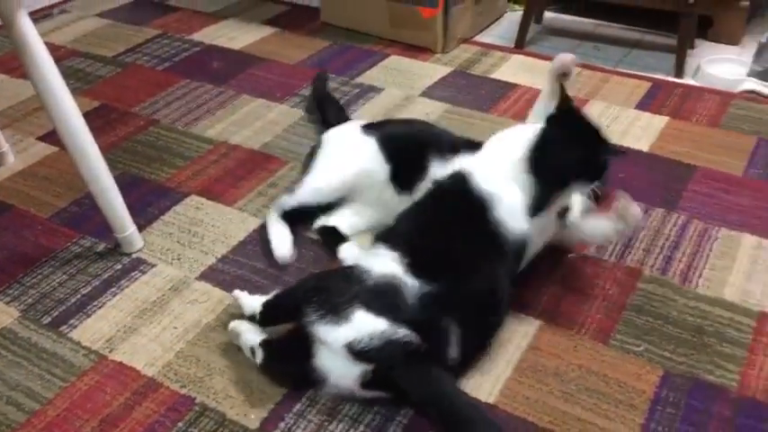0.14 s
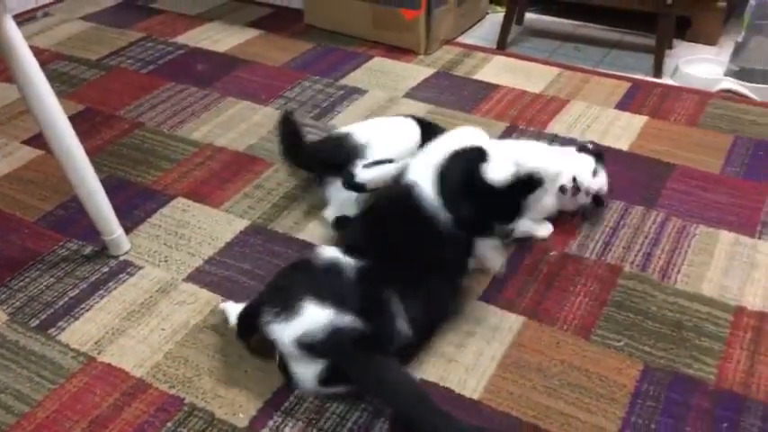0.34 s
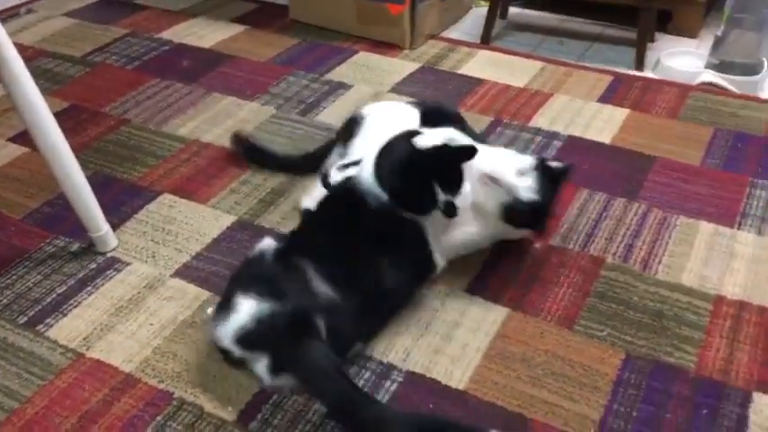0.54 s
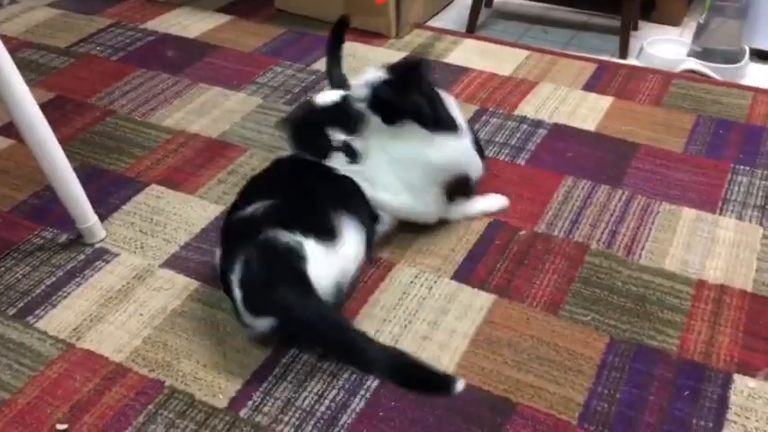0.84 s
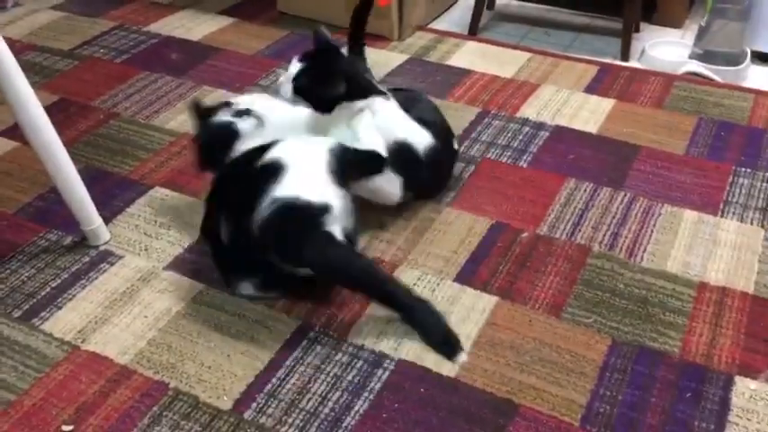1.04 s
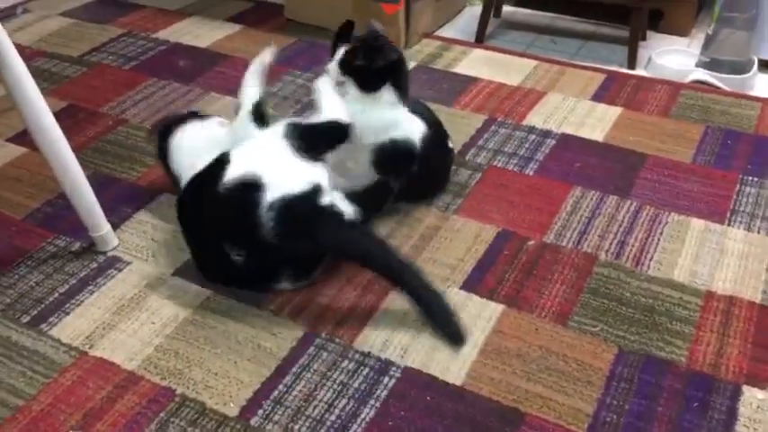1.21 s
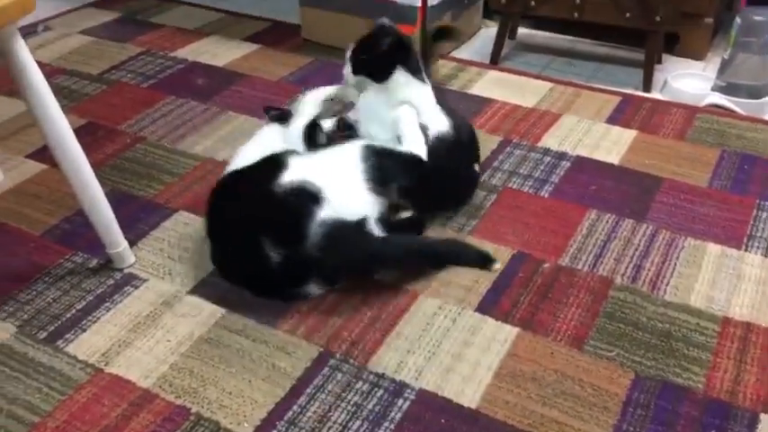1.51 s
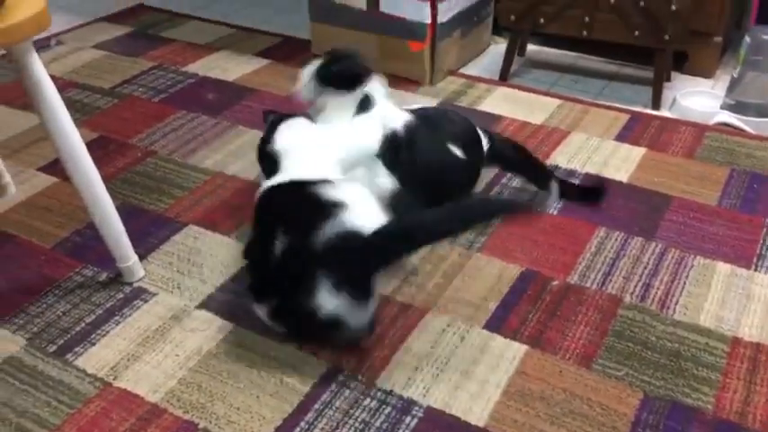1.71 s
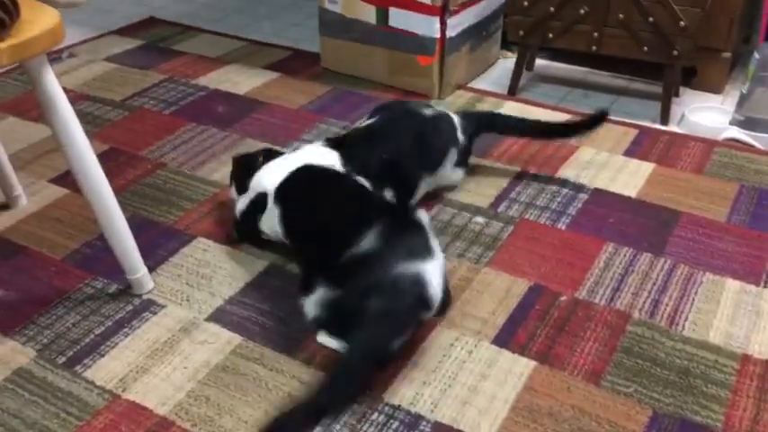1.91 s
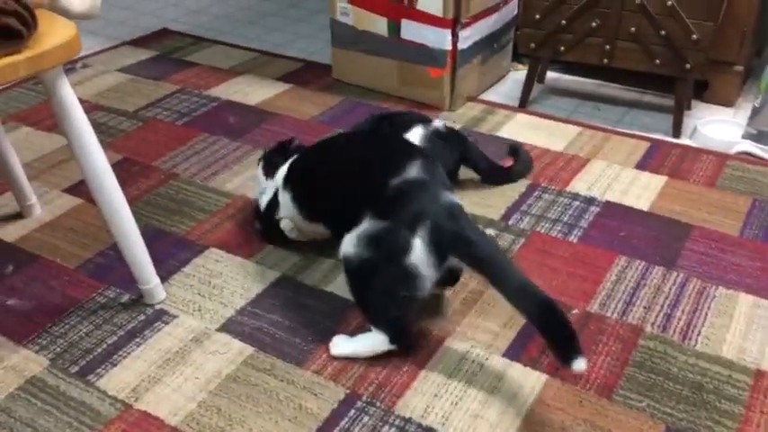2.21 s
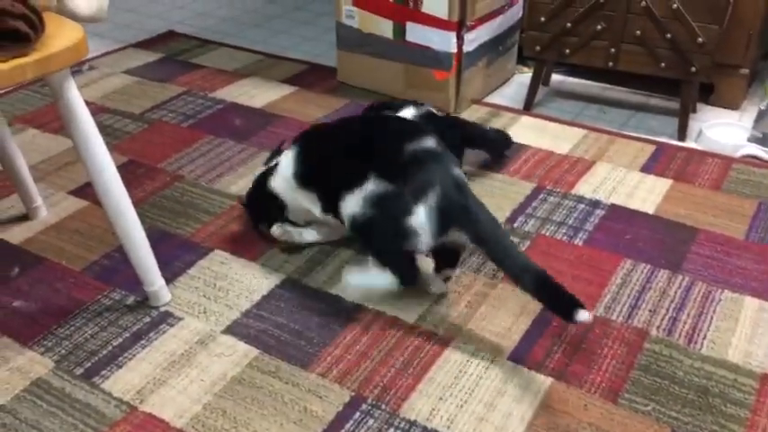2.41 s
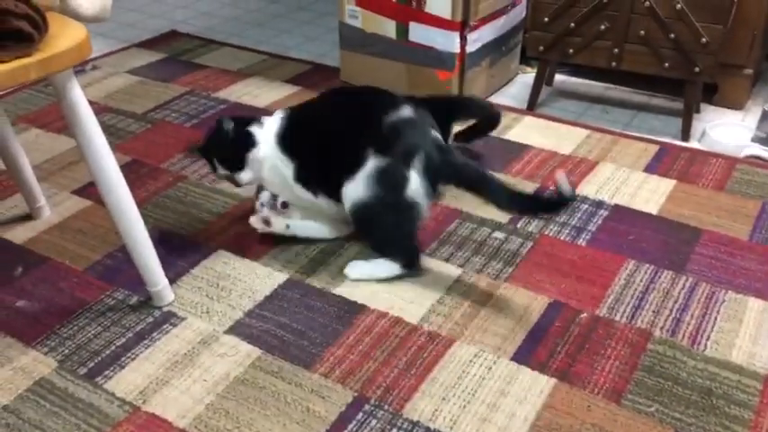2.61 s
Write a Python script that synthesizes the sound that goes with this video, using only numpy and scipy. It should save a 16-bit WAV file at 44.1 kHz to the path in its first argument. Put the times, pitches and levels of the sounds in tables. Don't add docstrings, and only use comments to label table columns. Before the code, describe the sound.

Cat scuffle on a carpeted floor, starting with a dull body thump, followed by dry claw snags, a short pause, a second flurry of low thuds and scratches, then soft paw bumps over faint room hum and hiss.

```python
import sys
import numpy as np
from scipy import signal
from scipy.fft import rfft, irfft, next_fast_len
from scipy.io import wavfile
from scipy.ndimage import uniform_filter1d

SR = 44100
rng = np.random.default_rng(int(sys.argv[2]) if len(sys.argv) > 2 else 0)


def dump_mix(stems):
    frames = np.atleast_2d(stems).T
    limited = np.clip(frames, -1, 1)
    pcm = np.round(limited * 32767).astype(np.int16)
    wavfile.write(sys.argv[1], SR, pcm)


def to_linear_factor(level_db):
    exponent = np.asarray(level_db, float) / 20
    return 10 ** exponent


N = 121275

# f/Hz, density/dB per Hz
ROOM_TONE = [(50, -10.5), (120, -16), (350, -17), (520, -23), (3200, -32.5), (12000, -39.5), (15000, -45)]
# t/s, level/dB
BOARD_TREMBLE = [(0.0, -67), (0.18, -60.5), (.33, -59), (0.53, -60), (.68, -61), (.88, -68), (1.09, -66),
                 (1.28, -67), (1.36, -74), (1.45, -65), (1.6, -66), (1.849, -48.5), (1.98, -63.5),
                 (2.11, -73.5), (2.75, -69.5)]
# t/s, level/dB
FUR_LEVELS = [(0, -74.5), (.2, -77.5), (.4, -76), (.5, -87), (.7, -78.5), (.85, -73.5), (1.0, -64),
              (1.1, -87.5), (1.3, -77), (1.5, -81.5), (1.6, -80), (1.685, -71), (1.78, -84), (2.15, -82),
              (2.3, -79), (2.4, -82.5), (2.6, -80), (2.75, -77.5)]
# f/Hz, level/dB
FUR_COLOUR = [(200, -6.5), (1000, -2), (3000, -4.5), (5000, -9.5), (8000, -15.5), (15000, -18.5)]
# f/Hz, level/dB, t60/s
BOARD_MODES = [(50, 1, 0.35), (72, -5, 1), (90, -9, 0.068), (110, -3.5, 0.14), (137.6, -4.5, 0.53),
               (170, -2.5, 0.26), (199, -9, 0.53), (253, -11.5, 0.22), (300, -1.5, 0.058), (338, -6, 0.131),
               (397, -11.5, 0.23)]
# t/s, level/dB, f/Hz, spread/octaves
PAW_BLOWS = [(0.019, -43.5, 72, 0.092), (0.491, -55, 161, 0.42), (.253, -31, 190, .4),
             (.272, -39.5, 170, 0.5), (.286, -46, 110, .3), (.298, -40, 146.4, 0.46),
             (.462, -57.5, 137, .3), (.421, -53, 150, .4), (0.32, -42, 199, 0.22), (0.403, -45.5, 85, 0.64),
             (.3385, -43, 199, 0.3), (.756, -50.5, 250, 0.41), (0.811, -48.5, 190, 0.2),
             (0.847, -50, 72, 0.3), (.771, -52, 202, 0.33), (.82, -53, 199, 0.2), (.972, -50, 199, 0.5),
             (1.031, -49, 200, .4), (0.993, -43.5, 250, 0.73), (1.022, -42, 210, .8),
             (1.048, -48, 69.4, 0.58), (1.706, -42, 119, 0.55), (1.778, -46, 81, 0.4),
             (1.841, -51, 150, .7), (1.691, -52, 200, 0.46), (1.719, -46.5, 300, 0.27),
             (1.7246, -39, 198, 0.99), (1.738, -41, 74, 0.59), (1.764, -50.5, 90, 0.25),
             (1.803, -41, 138, 0.46), (1.8205, -34, 90, 0.37), (1.874, -49, 85, 0.3),
             (1.907, -51.5, 77, 0.19), (1.978, -53, 68.4, 0.36), (2.102, -55.5, 135, 0.23),
             (2.125, -58.5, 300, 0.37), (2.13, -58, 90, .3), (2.159, -62.5, 90, 0.27), (2.345, -62, 50, .3),
             (2.225, -54, 50, 0.34), (2.459, -39, 130, 0.7), (2.487, -47, 81, 0.32), (2.475, -48, 90, .4),
             (2.498, -45, 90, 0.44), (2.513, -46.5, 119, 0.33), (2.558, -56, 81, 0.17),
             (2.595, -51.5, 90, 0.35), (2.67, -56, 330, 0.77), (2.685, -58, 90, 0.44),
             (2.451, -47.5, 347, 0.52)]
# t/s, level/dB, f/Hz, spread/octaves
PAW_LIFTS = [
    (.2558, -36, 170, .4),
    (1.9325, -43, 200, 1.0),
    (1.7985, -43, 170, .6),
    (1.669, -51, 170, .6),
    (1.716, -45, 140, .6),
    (.837, -53, 80, .4),
    (2.085, -55, 140, .3),
    (2.4805, -46, 100, .4),
    (2.4945, -48, 110, .5),
    (1.844, -50, 330, .4),
]
# f/Hz, level/dB, t60/s
SLAM_MODES = [(72, -38.5, 0.2), (134, -30.5, 0.47), (199, -28.5, 0.22), (229, -36.5, 0.44),
              (363, -46, 0.096), (300, -48, 0.06), (442, -54.5, 0.049)]
# t/s, length/s, level/dB, f/Hz
PAW_DRAGS = [(0.31, 0.14, -83, 1100), (0.536, 0.12, -77, 2660), (0.705, 0.08, -69, 2300),
             (0.777, 0.06, -68, 2300), (.82, .06, -72, 900), (0.81, 0.1, -79, 7040), (.87, .12, -79, 7500),
             (1.718, .12, -75, 600), (1.26, .03, -74, 4280), (2.544, 0.075, -76.5, 2500),
             (0.908, 0.068, -70, 1780), (0.955, 0.07, -60, 850), (1.255, 0.021, -73, 5000),
             (1.427, 0.048, -66, 3000), (2.122, 0.053, -73, 1300), (1.63, 0.06, -67, 1200),
             (1.668, 0.045, -58, 2800), (1.704, 0.039, -63, 875), (1.748, 0.07, -73, 1260),
             (1.861, 0.033, -60.5, 2080), (2.325, 0.06, -67, 1050), (2.34, .035, -70, 2400),
             (2.359, 0.033, -63, 2830), (2.475, 0.048, -69.5, 1590), (2.66, 0.04, -70, 600),
             (2.714, 0.048, -66.5, 2440)]
# t/s, peak level/dB, f/Hz, fizz/0-1
CLAW_SNAGS = [(0.7222, -54, 2000, 0.2), (0.7347, -51, 1450, 0.2), (0.7482, -51, 1430, 0.2),
              (0.7524, -52, 1370, 0.2), (0.7886, -52, 1920, 0.2), (0.7944, -57, 1450, 0.2),
              (0.9218, -51, 1290, 0.2), (0.9454, -59, 1560, 0.2), (0.9647, -46, 1330, 0.2),
              (0.9792, -45, 1360, 0.2), (0.9887, -45, 1250, 0.15), (0.9984, -47, 1100, 0.2),
              (1.0081, -42, 1250, 0.1), (1.0204, -50, 1000, 0.2), (1.6761, -50, 1190, 0.2),
              (1.708, -45, 1150, 0.1), (1.7154, -53, 1360, 0.2), (1.7689, -55, 1130, 0.2),
              (1.7884, -57, 2100, 0.2), (1.6915, -56, 1150, .2), (1.663, -57, 1600, .2),
              (1.814, -59, 1300, .2), (2.4473, -65, 1630, 0.2), (2.4808, -65, 1790, 0.2),
              (2.6668, -62, 900, 0.2), (2.7272, -64, 1850, 0.2)]
# t/s, peak level/dB, f/Hz, spread/octaves
CLAW_TICKS = [(0.7885, -63, 2780, 0.59), (0.9226, -51, 2480, 0.52), (.9895, -58, 4000, 1),
              (1.009, -54, 6000, 0.85), (1.2576, -49, 4500, 1.8), (2.075, -64, 3000, 1.1),
              (2.243, -63.5, 3200, 0.19), (2.4818, -62, 2800, 0.55), (1.6764, -43, 2900, 0.42),
              (1.6748, -65, 8000, 1.3), (1.6815, -71, 7000, 0.84), (2.385, -57, 6000, 1.2),
              (2.553, -57, 7300, 0.3), (2.635, -61, 7000, .4), (2.668, -57, 2200, 0.9)]
# f/Hz, width/Hz, depth/0-1
MIC_DIPS = [(5000, 590, 0.39), (10380, 260, 0.78)]


def level(x, db):
    return x * to_linear_factor(db) / np.sqrt(np.mean(x ** 2))


def shade(x, gain):
    size = next_fast_len(len(x))
    hz = np.maximum(np.arange(size // 2 + 1) * SR / size, 1)
    return irfft(rfft(x, size) * gain(hz), size)[:len(x)]


def points(table):
    hz, db = np.array(table).T
    return lambda f: to_linear_factor(np.interp(np.log(f), np.log(hz), db))


def bell(f, hz, octaves):
    return np.exp(-.5 * (np.log2(f / hz) / octaves) ** 2)


def walk(rate):
    hold = int(SR / rate)
    steps = np.repeat(rng.standard_normal(N // hold + 1), hold)
    return 1.3 * uniform_filter1d(uniform_filter1d(steps, hold), hold)[:N]


def crackle(per_s, scatter_db):
    moment, side, size = rng.random((3, N))
    return (moment < per_s / SR) * np.sign(side - .5) * to_linear_factor(-scatter_db * np.log(size + .01))


def room(t):
    air = level(shade(rng.standard_normal(N), points(ROOM_TONE)), -72)
    low_modes = lambda f: bell(f, 44, 0.18) + 0.6 * bell(f, 68.4, 0.46) + 0.17 * bell(f, 156, 0.6)
    rumble = level(shade(rng.standard_normal(N), low_modes), 0)
    flicker_db = 1.5 * walk(8.5)
    return air + rumble * to_linear_factor(np.interp(t, *np.array(BOARD_TREMBLE).T) + flicker_db)


def fur(t):
    grain = level(shade(crackle(6000, 2.5), points(FUR_COLOUR)), 0)
    return grain * to_linear_factor(np.interp(t, *np.array(FUR_LEVELS).T) + 1.46 * walk(29.9))


def ring(t, at, modes, rise, hold):
    smother_db_per_s, smother_max_db = 711.5, 13.5
    s = t - at
    swell = np.exp(-.5 * (np.minimum(s - 0.35 * rise, 0) / rise) ** 2)
    smother = to_linear_factor(-np.clip((s - hold) * smother_db_per_s, 0, smother_max_db))
    age = (s + np.hypot(s, rise)) / 2
    tones = sum(to_linear_factor(db - 60 * age / t60) * np.cos(2 * np.pi * hz * s) for hz, db, t60 in modes)
    return swell * smother * tones


def thumps(t):
    rise_cycles = 0.98
    out = ring(t, 0.2278, SLAM_MODES, rise=0.004, hold=0.016)
    pushes = [(1, blow) for blow in PAW_BLOWS] + [(-1, lift) for lift in PAW_LIFTS]
    for push, (at, db, hz, octaves) in pushes:
        span = slice(max(int((at - .08) * SR), 0), int((at + .5) * SR))
        gains = np.array([to_linear_factor(g) * bell(f, hz, octaves) for f, g, _ in BOARD_MODES]) + 1e-9
        shares_db = 20 * np.log10(gains / gains.sum())
        modes = [(f, db + share, t60) for (f, _, t60), share in zip(BOARD_MODES, shares_db)]
        out[span] += push * ring(t[span], at, modes, rise_cycles / hz, hold=0.015)
    return out


def drags(t):
    rise_s, fall_s = 0.019, 0.04
    low_db, air_db = -5, -21
    out = np.zeros(N)
    fibres = crackle(4000, 2.6) * to_linear_factor(1.8 * walk(90))
    for at, length, db, hz in PAW_DRAGS:
        span = slice(int(at * SR), int((at + length + .15) * SR))
        s = t[span] - at
        rise = np.clip(s / rise_s, 0, 1)
        fall = np.exp(-2 * np.maximum(s - length + fall_s, 0) / fall_s)
        tone = lambda f: (bell(f, hz, 0.7) + to_linear_factor(low_db) * bell(f, hz / 2.6, 2.0)
                          + to_linear_factor(air_db) * bell(f, 10200, 0.29))
        out[span] += rise * fall * level(shade(fibres[span], tone), db)
    return out


def snags():
    size, lag_s, boost_db = 2048, 0.0006, 2
    start_hz, end_hz, fall_s = 1039, 250, 0.00301
    out = np.zeros(N + size)
    s = np.arange(size) / SR
    hump = lambda peak_s: s / peak_s * np.exp(1 - s / peak_s)
    turns = end_hz * s + (start_hz - end_hz) * fall_s * (1 - np.exp(-s / fall_s))
    thud = to_linear_factor(-11) * np.sin(2 * np.pi * turns) * hump(0.0048)
    for at, db, hz, fizzy in CLAW_SNAGS:
        pop = np.sin(2 * np.pi * hz * s) * hump(0.0004)
        fibres = shade(rng.standard_normal(size), lambda f: bell(f, hz * 1.36, 0.75))
        fizz = level(fibres, -10.5) * np.exp(-s / 0.0045)
        start = int((at + lag_s) * SR)
        out[start:start + size] += to_linear_factor(db + boost_db) * (pop + thud + 3.35 * fizzy * fizz)
    return out[:N]


def ticks():
    out = np.zeros(N + 256)
    impulse = np.diff(np.arange(257) > 128) * 1.
    for at, db, hz, octaves in CLAW_TICKS:
        click = shade(impulse, lambda f: 1j * bell(f, hz, octaves))
        start = int(at * SR) - 128
        out[start:start + 256] += to_linear_factor(db) * click / click.max()
    return out[:N]


def echo(boom, scuff):
    s = np.arange(SR // 2) / SR
    tail = shade(rng.standard_normal(len(s)), lambda f: 1 / (1 + f / 3000))
    tail = tail * to_linear_factor(-60 * s / 0.25) * (s > .004)
    tail = tail / np.sqrt(np.sum(tail ** 2))
    return signal.fftconvolve(to_linear_factor(-10) * scuff + to_linear_factor(-21.5) * boom, tail)[:N]


def scene():
    t = np.arange(N) / SR
    bed = room(t)
    scuff = fur(t) + drags(t) + snags() + ticks()
    boom = thumps(t)
    return (bed + boom + scuff + echo(boom, scuff))[None]


def roll_off(x):
    return signal.sosfilt(signal.butter(12, 15360, fs=SR, output="sos"), x)


def record(dry):
    top_hz, low_cut_hz = 15300, 43

    def microphone(f):
        dips = np.prod([1 - depth / (1 + (2 * (f - hz) / width) ** 2)
                        for hz, width, depth in MIC_DIPS], axis=0)
        return dips / (1 + (f / top_hz) ** 80) / np.sqrt(1 + (low_cut_hz / f) ** 8)

    mix = shade(dry[0], microphone)[None]
    return roll_off(mix)


dry = scene()
out = record(dry)
dump_mix(out)
```